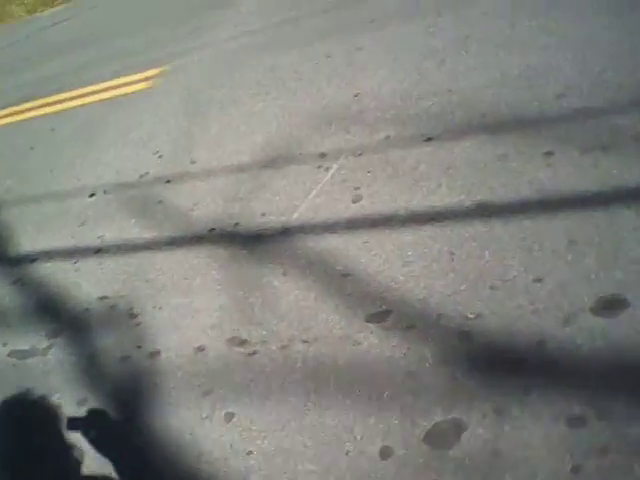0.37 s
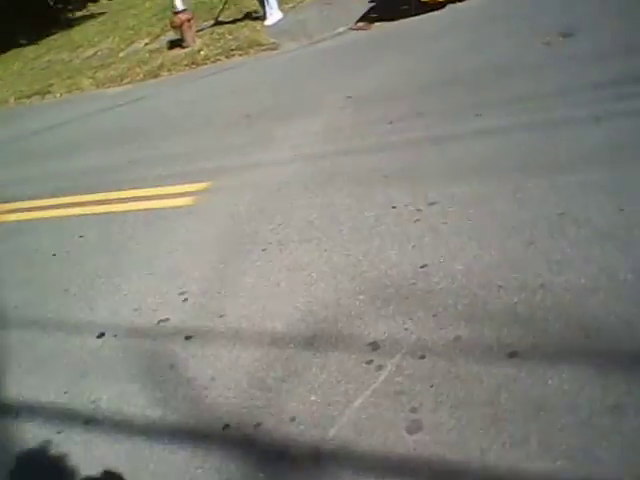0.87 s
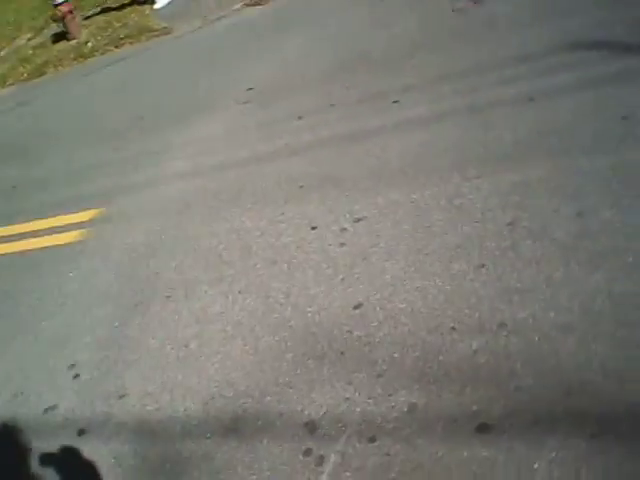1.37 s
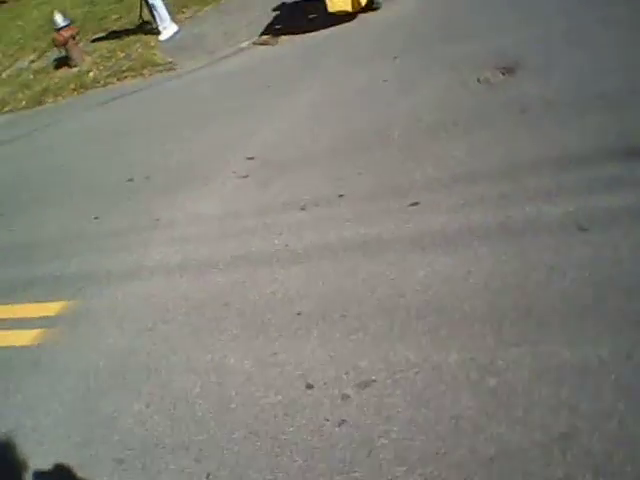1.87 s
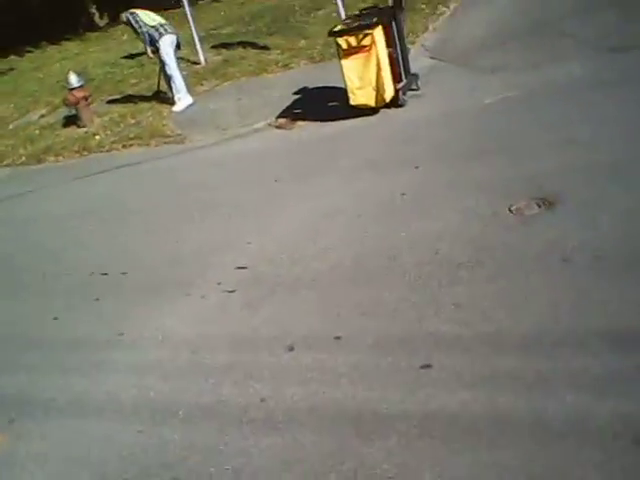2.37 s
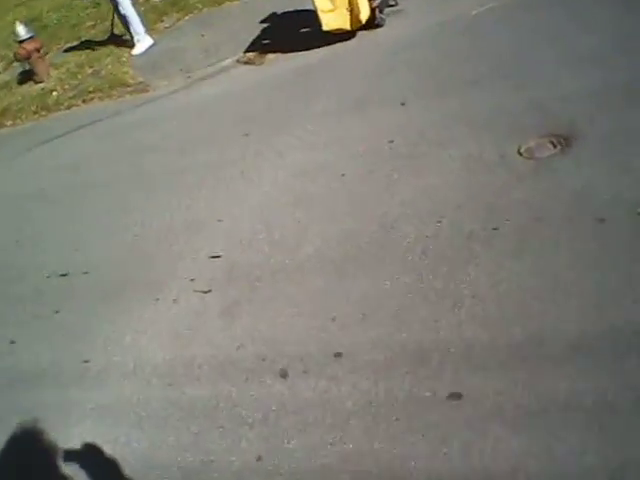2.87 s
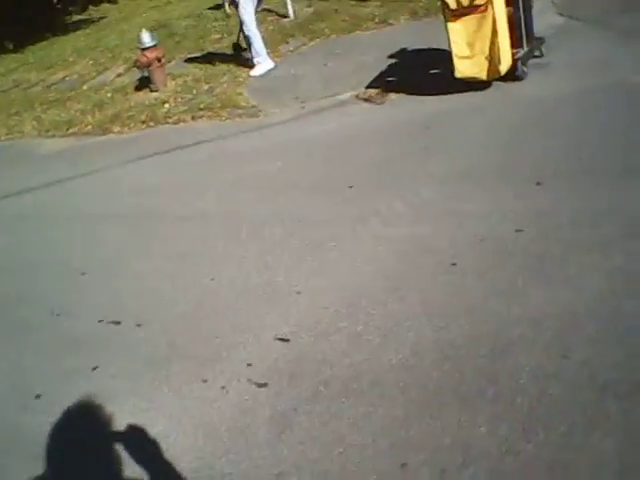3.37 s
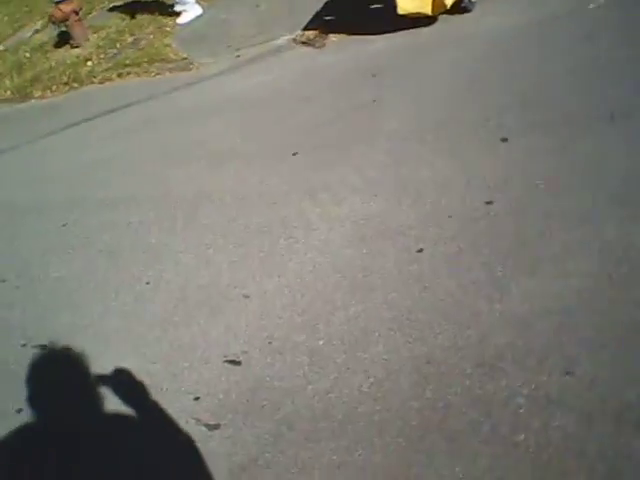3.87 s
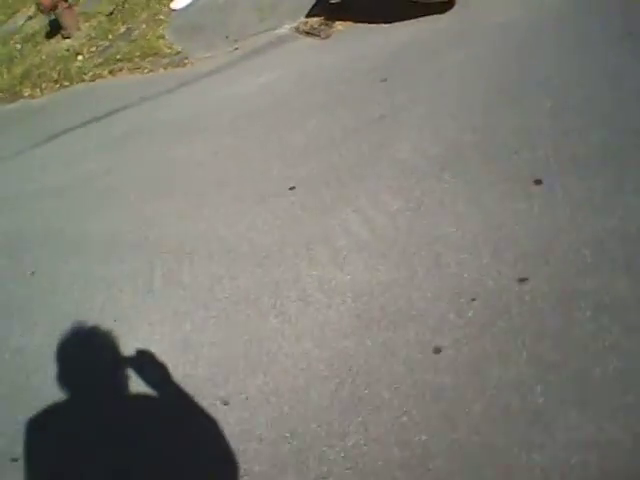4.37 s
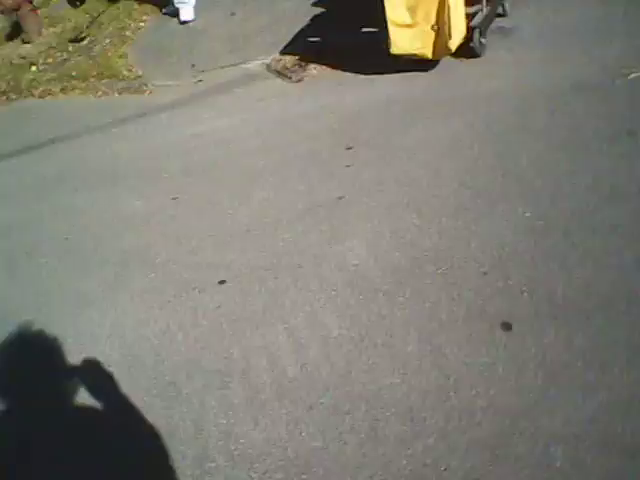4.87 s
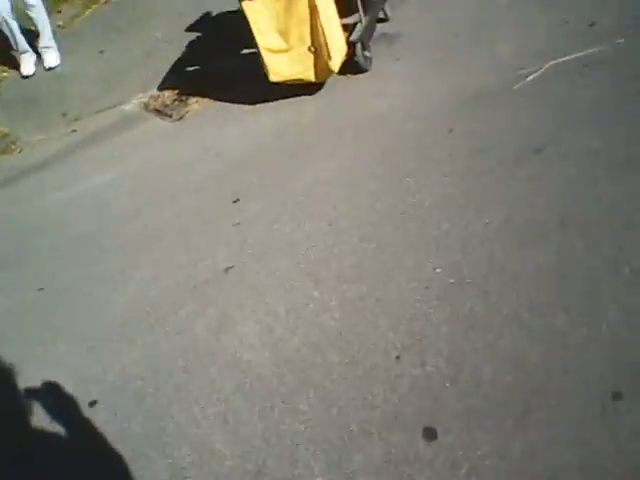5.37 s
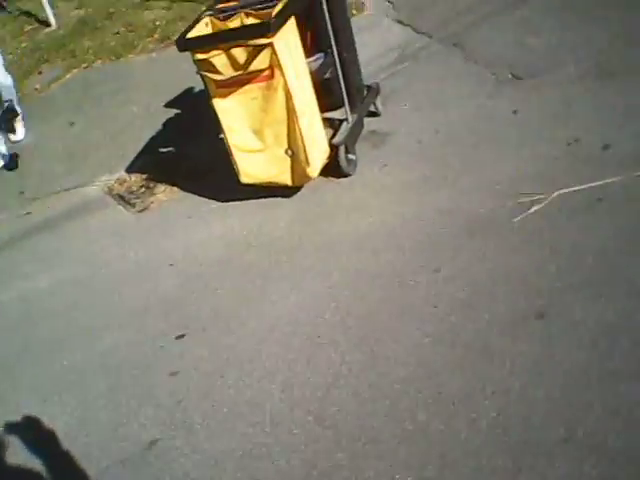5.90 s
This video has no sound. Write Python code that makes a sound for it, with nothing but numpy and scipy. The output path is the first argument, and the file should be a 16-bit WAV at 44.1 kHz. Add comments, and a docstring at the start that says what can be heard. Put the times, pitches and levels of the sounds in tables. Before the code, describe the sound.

Close, rough wind noise dominates: slow rumble, ragged flutter and crackling pops right at a cheap camera's microphone. It eases in the middle, then surges with heavy thuds. Dry high squeals, like a cart wheel, chirp at two close pitches and smear into a short outdoor echo. Behind them are soft street noise, tiny ringing ticks and faint regular hiss pulses, all slightly gritty and dull on top.

```python
"""Wind buffets the bare microphone of a small hand-held camera on a street, in slow lumps and ragged bursts.
It is shaped noise with short pops and humps of pressure. A dry metal squeal, a few wavering sines, comes
and goes on two close pitches, echoed by house fronts. Tiny ringing ticks sound near by; the street is a
noise wash in which a narrow band swells. The camera's electronics add brief faint hiss pulses and two
steady tones."""
import sys
import numpy as np
from scipy import signal
from scipy.fft import rfft, irfft
from scipy.io import wavfile

SR = 44100
rng = np.random.default_rng(int(sys.argv[2]) if len(sys.argv) > 2 else 0)


def elevation(decibels):
    """Turn decibel levels (scalar or array-like) into linear amplitude ratios."""
    levels = np.asarray(decibels, float)
    return 10 ** (levels / 20)


def persist_wave(psi):
    """Save psi, clipped to +-1, as 16-bit WAV."""
    counts = np.round(np.clip(psi, -1, 1) * 32767).astype(np.int16)
    wavfile.write(sys.argv[1], SR, np.atleast_2d(counts).T)


N = 265041

# wind on the microphone: time_s, rumble_db, turbulence_db
WIND = [(0, -33.5, -45), (0.15, -26, -43.5), (0.33, -32.5, -46.5), (0.45, -28.5, -38), (0.7, -31, -43.5),
        (0.84, -26.5, -35.5), (1.02, -32, -38.5), (1.26, -32, -38.5), (1.32, -39, -26), (1.43, -36, -25),
        (1.59, -39, -30.5), (1.62, -31, -43), (1.68, -36, -41.5), (1.88, -27, -47), (2.16, -28, -42),
        (2.35, -32, -56), (2.62, -38.5, -47), (2.94, -36.5, -49), (3.04, -30, -46), (3.45, -32.5, -42),
        (3.79, -33.5, -43.5), (3.85, -20.5, -32), (4.04, -24.5, -44), (4.1, -25, -23), (4.16, -29.5, -24.5),
        (4.27, -23, -37.5), (4.4, -21.5, -31.5), (4.54, -29, -41), (4.65, -34.5, -30), (4.84, -36, -43.5),
        (4.96, -33, -36.5), (5.0, -26, -26.5), (5.06, -31, -29.5), (5.09, -24, -43), (5.2, -26, -40.5),
        (5.54, -38, -48), (5.71, -28.5, -47), (5.76, -25.5, -29.5), (5.88, -34, -28), (6.01, -25.5, -50.5)]


def evened(x):
    """Scales to rms 1."""
    return x / np.sqrt(np.mean(x ** 2) + 1e-20)


def shaped(x, points):
    """Filters by a spectrum given in dB, joined up along log frequency."""
    f, db = np.transpose(points)
    hz = np.fft.rfftfreq(len(x), 1 / SR)
    gain_db = np.interp(np.log(hz + 1), np.log(f + 1), db)
    return irfft(rfft(x) * elevation(gain_db), len(x))


def wander(hz, size=N):
    """Chance movement slower than about hz, rms 1."""
    falloff = 1 + (np.fft.rfftfreq(size, 1 / SR) / hz) ** 4
    return evened(irfft(rfft(rng.standard_normal(size)) / falloff, size))


def curve(rows, column=1):
    """One column of a table at every sample."""
    return np.interp(np.arange(N) / SR, [r[0] for r in rows], [r[column] for r in rows])


def add(mix, start_s, sound):
    """Mixes a sound in at start_s."""
    part = mix[round(start_s * SR):][:len(sound)]
    part += sound[:len(part)]


def turbulence():
    """Strength of the eddies at the microphone port: the gusting wind, with ragged bursts on top."""
    # an eddy breaks on the port: time_s, peak_db, rise_s
    bursts = [(0.279, -15.5, 0.0073), (0.317, -18, 0.023), (0.361, -21, 0.024), (0.423, -12.5, 0.021),
              (0.49, -15, 0.016), (0.528, -12.5, 0.01), (0.618, -22, 0.011), (0.79, -18, 0.024),
              (0.91, -11.5, 0.0054), (0.948, -18, 0.014), (1.051, -16.5, 0.01), (1.101, -18, 0.013),
              (1.158, -15.5, 0.012), (1.264, -17, 0.013), (1.407, -9.5, 0.01), (1.751, -18.5, 0.017),
              (1.847, -13.5, 0.018), (1.897, -16, 0.024), (2.064, -23.5, 0.02), (2.119, -17.5, 0.013),
              (2.159, -15.5, 0.018), (2.225, -18, 0.014), (2.285, -16, 0.0098), (3.018, -15.5, 0.028),
              (3.14, -21.5, 0.017), (3.205, -25.5, 0.015), (3.259, -23.5, 0.028), (3.305, -18.5, 0.021),
              (3.42, -16.5, 0.021), (3.459, -14.5, 0.0092), (3.55, -9.5, 0.025), (3.632, -17, 0.027),
              (3.722, -17.5, 0.016), (3.784, -18.5, 0.015), (3.889, -6.5, 0.0072), (3.933, -18, 0.031),
              (3.976, -1, 0.0089), (4.027, -9.5, 0.011), (4.066, -9, 0.0069), (4.195, -8, 0.014),
              (4.305, -14, 0.026), (4.366, -6, 0.03), (4.501, -14, 0.0066), (4.553, -16, 0.033),
              (4.744, -15, 0.013), (4.8, -20.5, 0.01), (4.827, -24, 0.0062), (4.895, -14, 0.019),
              (4.961, -15.5, 0.022), (5.086, -13, 0.0067), (5.133, -10, 0.0064), (5.195, -31, 0.029),
              (5.231, -13, 0.015), (5.311, -12, 0.02), (5.402, -14.5, 0.014), (5.554, -19, 0.033),
              (5.677, -18, 0.017), (5.723, -15, 0.027)]
    crest_db = 12.5  # noise runs well under its peaks
    body = np.zeros(N)
    for s, db, rise in bursts:
        u = np.arange(0, 4, 1 / (SR * rise))
        swell = (u * np.exp(1 - u)) ** 2
        add(body, s - .006, elevation(db - crest_db) * swell)
    gusts = elevation(curve(WIND, column=2) + 1.37 * wander(25.))
    return np.hypot(gusts, body)


def wind(force):
    """Slow pressure lumps and turbulence; the small eddies flutter hardest and grow most in a hard gust."""
    # spectra before levelling: freq_hz, relative_db
    rumble_spectrum = [(8, -14.5), (20, 6.5), (45, 5), (90, -3), (160, -12), (300, -53), (700, -110)]
    large_spectrum = [(60, -3), (130, 0.5), (300, -0.5), (500, -9.5), (800, -18.5), (1400, -73),
                      (2500, -110)]
    small_spectrum = [(200, -5.5), (450, 1.5), (800, -12.5), (1200, -24.5), (1800, -39), (2600, -44),
                      (3500, -110)]
    lumps = shaped(rng.standard_normal(N), rumble_spectrum) * elevation(0.6 * wander(12.))
    rumble = evened(lumps) * elevation(curve(WIND))
    flutter = np.clip(wander(95.), -3, 2)
    large = evened(shaped(rng.standard_normal(N) * elevation(2.5 * flutter), large_spectrum))
    small = evened(shaped(rng.standard_normal(N) * elevation(5.64 * flutter), small_spectrum))
    return rumble + large * force + 0.63 * small * force ** 1.223


def street_wash():
    """Distant street: steady broad noise that drifts slightly in level."""
    # spectrum before levelling: freq_hz, relative_db
    wash_spectrum = [(150, 3), (500, -12), (1050, -4.5), (1500, -14.5), (2500, -22), (4000, -23),
                     (6500, -22), (8000, -23.5), (10000, -25)]
    # loudness: time_s, rms_db
    wash_level = [(0, -47.5), (1.5, -49.5), (2.5, -47.5), (2.9, -48), (3.7, -47.5), (4.3, -48), (4.7, -51),
                  (6.01, -50)]
    return elevation(curve(wash_level) + .5 * wander(5.4)) * evened(shaped(rng.standard_normal(N), wash_spectrum))


def swelling_band():
    """Noise through a narrow resonance, swelling now and then."""
    # loudness: time_s, rms_db
    swells = [(0, -74), (0.85, -72), (1.37, -63), (1.7, -81), (1.95, -56), (2.11, -62), (2.18, -58),
              (2.36, -59), (2.42, -57), (2.48, -77), (3.1, -63), (3.3, -70), (3.37, -55), (3.42, -57.5),
              (3.47, -65.5), (4.42, -67.5), (4.57, -79), (4.99, -71), (6.01, -73)]
    centre_hz, width_hz = 1934, 330  # filtered both ways, so the width lies between the -6 dB points
    peak = signal.iirpeak(centre_hz, centre_hz / width_hz, SR)
    band = evened(signal.filtfilt(*peak, rng.standard_normal(N)))
    return band * elevation(curve(swells) + 3.1 * wander(25.))


def whine():
    """Electronics: faint steady sines."""
    # freq_hz, rms_db
    whine_tones = [(7248, -80), (9600, -84)]
    t = np.arange(N) / SR
    return sum(elevation(db) * np.sqrt(2) * np.sin(2 * np.pi * hz * t) for hz, db in whine_tones)


def pops(force):
    """Sharp pops at the port: a wiggle of a cycle or two at any phase, among three smaller, brighter kinks."""
    # pops at set times, most of them loud: centre_s, level_db, pitch_hz
    set_pops = [(0.281, -19.5, 426), (0.343, -18.5, 570), (0.385, -18.5, 630), (0.428, -20, 640),
                (0.451, -12.5, 750), (0.494, -21, 574), (0.533, -14, 647), (0.555, -23, 676),
                (0.803, -22, 614), (0.85, -22, 710), (0.904, -18, 576), (0.949, -19, 675),
                (0.988, -21.5, 525), (1.059, -20.5, 457), (1.078, -26, 554), (1.114, -27, 665),
                (1.153, -19.5, 520), (1.193, -25, 593), (1.218, -20, 596), (1.28, -14, 560),
                (1.298, -16, 505), (1.337, -19.5, 500), (1.354, -17.5, 670), (1.411, -14, 228),
                (1.423, -16, 620), (1.463, -19, 490), (1.553, -19, 470), (1.773, -23.5, 600),
                (1.955, -26.5, 564), (2.074, -21.5, 503), (2.179, -20.5, 590), (3.077, -14.5, 470),
                (3.307, -21.5, 473), (3.416, -22.5, 505), (3.462, -18.5, 463), (3.583, -18.5, 493),
                (3.74, -21, 476), (3.89, -22, 554), (3.985, -10, 424), (4.036, -26, 434), (4.125, -16, 440),
                (4.389, -10, 543), (4.409, -15, 510), (4.44, -23, 430), (4.502, -23, 470),
                (4.647, -28, 603), (4.756, -23, 580), (4.808, -27.5, 510), (4.845, -26, 520),
                (4.909, -15.5, 567), (4.961, -21, 480), (4.982, -26, 560), (5.029, -19, 566),
                (5.087, -20.5, 506), (5.139, -13.5, 517), (5.327, -44, 397), (5.745, -22, 417),
                (5.784, -23, 510), (5.824, -22, 530), (5.895, -23, 420)]
    # further pops fall by chance, tied to the turbulence around them
    chance_count, above_force_db, middle_hz, spread_hz = 120, 4.5, 580, 215
    chance_pops = []
    for place, pitch in rng.random((chance_count, 2)):
        s = .02 + place * (N / SR - .04)
        db = above_force_db + 20 * np.log10(force[int(s * SR)])
        chance_pops.append((s, db, middle_hz + spread_hz * (pitch - .5)))
    every_pop = chance_pops + list(set_pops)
    out = np.zeros(N)
    for (s, db, hz), (phase, *draws) in zip(every_pop, rng.random((len(every_pop), 7))):
        u = np.arange(-6, 6, hz / SR)  # cycles from the centre
        wiggle = np.exp(-(u / 0.52) ** 2) * np.cos(2 * np.pi * (u + phase))
        for kink_phase, lag in np.reshape(draws, (3, 2)):
            v = u - 4.52 * (lag - .5)
            wiggle += 0.22 * np.exp(-(v / 0.31) ** 2) * np.cos(2 * np.pi * (1.55 * v + kink_phase))
        add(out, s - 6 / hz, elevation(db) * wiggle)
    return out


def squeal(rows):
    """Stick-slip on a metal mode: a near sine wavering in grip and pitch; the twelfth shows when it bites hard."""
    s, *columns = np.transpose(rows)
    t = np.arange(s[0], s[-1] + 0.031, 1 / SR)
    hz, db = (np.interp(t, s, c) for c in columns)
    turns = np.cumsum(hz + 6.1 * wander(53.0, size=len(t))) / SR
    # the octave is near -43.5 dB when the tone is at -33 dB; the twelfth -53.5 dB when it is at -29.5 dB
    octave_db = -43.5 + 0.96 * (db + 33) + 1.5 * wander(9.5, size=len(t))
    twelfth_db = -53.5 + 1.4 * (db + 29.5)
    tone = np.zeros(len(t))
    for harmonic, level_db in enumerate((db, octave_db, twelfth_db), 1):
        grip_db = 2.1 * wander(53.0, size=len(t))
        tone += elevation(level_db + grip_db) * np.sin(2 * np.pi * harmonic * turns)
    fade = np.clip(np.minimum(t - t[0], t[-1] - t) / 0.0056, 0, 1)
    return s[0], np.sqrt(2) * tone * fade


def metal():
    """Every squeal of the metal, dry."""
    # one list a squeal: time_s, pitch_hz, fundamental_rms_db
    squeal_tracks = [
        [(0.78, 3375, -64), (0.81, 3410, -61), (0.86, 3357, -44.5), (0.91, 3286, -71), (0.98, 3340, -69),
         (1.1, 3375, -76)],
        [(3.03, 3320, -78), (3.064, 3300, -62), (3.124, 3315, -70), (3.18, 3360, -73)],
        [(3.38, 3379, -70), (3.418, 3377, -49.5), (3.478, 3386, -46.5), (3.53, 3390, -42), (3.56, 3394, -44.5),
         (3.578, 3410, -55), (3.624, 3370, -36), (3.662, 3383, -32.5), (3.738, 3383, -37), (3.76, 3367, -51),
         (3.794, 3410, -38), (3.885, 3390, -61), (3.905, 3400, -54.5), (4.0, 3440, -66), (4.13, 3430, -72),
         (4.33, 3370, -72)],
        [(4.35, 3276, -76), (4.372, 3236, -36.5), (4.39, 3220, -37), (4.426, 3204, -40.5), (4.47, 3300, -46),
         (4.5, 3280, -56), (4.56, 3270, -70), (4.68, 3300, -68)],
        [(4.36, 3180, -65), (4.385, 3110, -50), (4.43, 3144, -54), (4.46, 3205, -74)],
        [(4.47, 3314, -59), (4.494, 3420, -54), (4.576, 3345, -64), (4.608, 3413, -44.5), (4.72, 3391, -80),
         (4.74, 3470, -61), (4.8, 3383, -77)],
        [(5.3, 3300, -79), (5.328, 3270, -62), (5.364, 3290, -70), (5.396, 3245, -46), (5.43, 3244, -44.5),
         (5.49, 3200, -66), (5.62, 3320, -67)],
        [(5.46, 3390, -57), (5.5, 3380, -58), (5.52, 3390, -39), (5.548, 3377, -44.5), (5.61, 3460, -63),
         (5.626, 3360, -53), (5.664, 3480, -83), (5.85, 3371, -84)],
    ]
    out = np.zeros(N)
    for rows in squeal_tracks:
        add(out, *squeal(rows))
    return out


def house_fronts(dry_metal):
    """House fronts smear the squeal: a decaying noise tail of unit energy, falling at 60 dB in 0.72 s."""
    t = np.arange(SR // 2) / SR
    tail = rng.standard_normal(SR // 2) * elevation(-60 * t / 0.72)
    echo = signal.fftconvolve(dry_metal, tail / np.linalg.norm(tail))[:N]
    return elevation(-9.5) * echo


def shoves():
    """Single slow shoves of air or hand: a hump of pressure with a dip on either side."""
    # centre_s, peak_db, half_width_s
    humps = [(1.411, -22, 0.0025), (2.149, -16.5, 0.0048), (3.85, -7, 0.0034), (3.886, -9.5, 0.011),
             (3.945, -13.5, 0.0079), (3.991, -8.5, 0.0082), (4.038, -7, 0.011), (4.401, -13.5, 0.015),
             (5.091, -9, 0.0076), (5.142, -12.5, 0.01), (5.257, -18, 0.0089)]
    out = np.zeros(N)
    for s, db, half in humps:
        u = np.arange(-4, 4, 1 / (SR * half))
        add(out, s - 4 * half, elevation(db) * (1 - u ** 2) * np.exp(-u ** 2 / 2))
    return out


def hiss_pulses():
    """Electronics: brief hiss at a steady pace held to a clock, mostly three clock ticks apart, at times two."""
    # pulse loudness: time_s, rms_db
    pulse_level = [(2.7, -60), (2.86, -53.5), (3.2, -57), (3.6, -52), (4.3, -56), (5.4, -61)]
    first_s, clock_s, pace_ticks, lead_ticks, count = 2.7053, .05035, 39 / 14, 2 / 3, 20
    gate = np.zeros(N)
    for s in first_s + clock_s * np.floor(pace_ticks * np.arange(count) + lead_ticks):
        db = np.interp(s, *np.transpose(pulse_level))
        add(gate, s - .003, elevation(db) * signal.windows.tukey(round(0.032 * SR), .6))
    hiss = shaped(rng.standard_normal(N), [(1500, -17.0), (3000, 5.5), (6000, 5.5), (10000, 4)])
    return gate * evened(hiss)


def ticks():
    """Tiny hard ticks near by, each a fast-dying high ring, and one dry wide click."""
    # start_s, level_db (before rise and decay), ring_hz
    tick_rings = [(2.8848, -42, 8010), (3.0155, -43, 7840), (3.557, -33, 8070), (4.3784, -49, 8120),
                  (4.79, -36, 8000), (4.9, -40, 8040), (5.3467, -44, 8000)]
    out, t = np.zeros(N), np.arange(400) / SR
    for s, db, hz in tick_rings:
        rise = np.minimum(t / 0.00046, 1)
        add(out, s, elevation(db - 60 * t / 0.0097) * rise * np.sin(2 * np.pi * hz * t))
    # the click starts at full strength, so it spreads wide over the spectrum
    add(out, 4.432, elevation(-34 - 60 * t / 0.0048) * np.cos(2 * np.pi * 2600 * t))
    return out


def scene():
    """All sources at one microphone, the squeal both direct and off the house fronts."""
    force = turbulence()
    dry_metal = metal()
    at_port = wind(force) + pops(force) + shoves()
    far = street_wash() + swelling_band()
    camera = hiss_pulses() + whine()
    mix = at_port + far + camera + ticks() + dry_metal + house_fronts(dry_metal)
    return mix[None]


def roll_off(x):
    """The treble ends steeply here."""
    return signal.sosfilt(signal.butter(12, 12090, fs=SR, output="sos"), x)


def record(dry):
    """Sampled at half rate: the band mirrors about a quarter of SR, under a soft filter; a small offset."""
    # converter filter: freq_hz, gain_db
    soft_filter = [(9000, -1.5), (10200, -3), (11000, -11), (11900, -22.5), (12300, -44), (13000, -70)]
    below = shaped(dry[0], [(SR / 4 - 20, 0), (SR / 4, -120)])
    mirrored = below * (1 + (-1.) ** np.arange(N))  # every other sample is zero
    finished = shaped(mirrored, soft_filter)[None] - .0047
    return roll_off(finished)


dry = scene()
out = record(dry)
persist_wave(out)
```